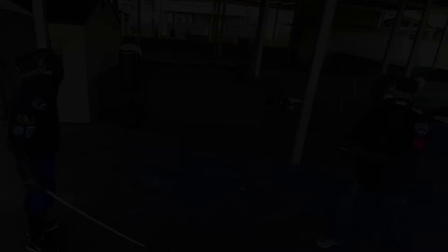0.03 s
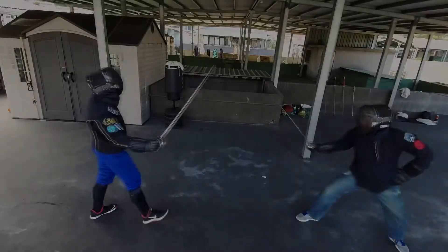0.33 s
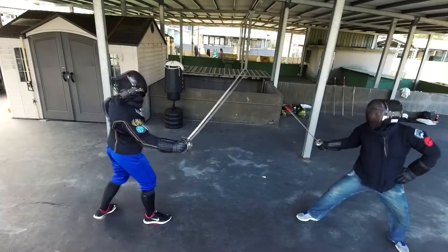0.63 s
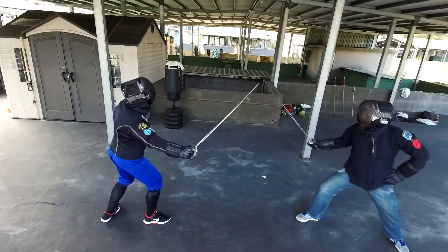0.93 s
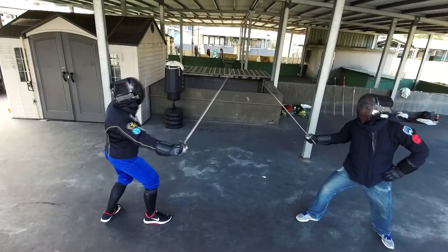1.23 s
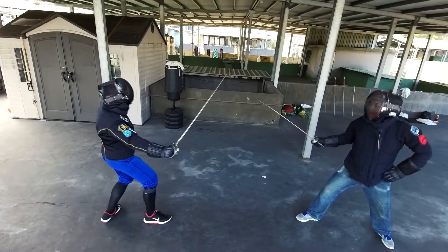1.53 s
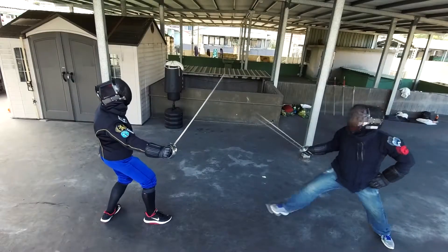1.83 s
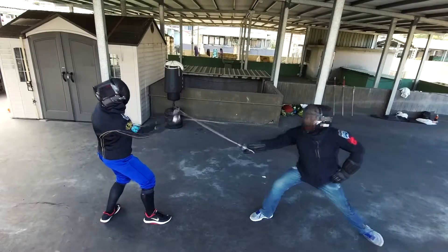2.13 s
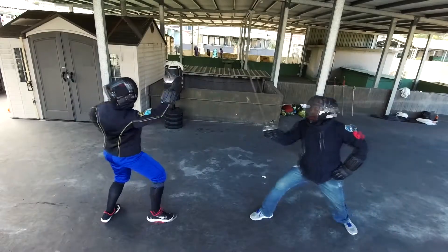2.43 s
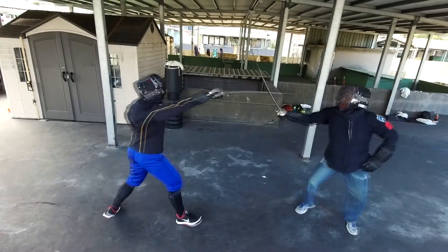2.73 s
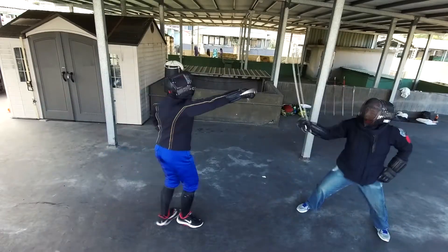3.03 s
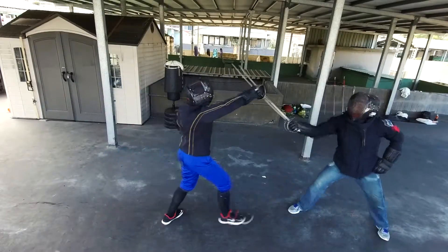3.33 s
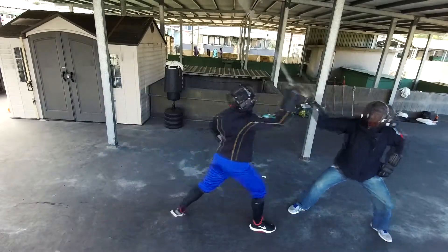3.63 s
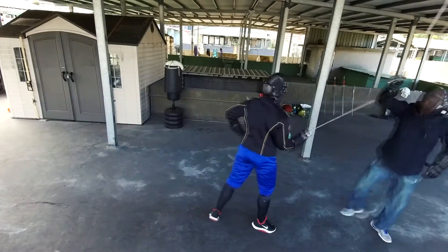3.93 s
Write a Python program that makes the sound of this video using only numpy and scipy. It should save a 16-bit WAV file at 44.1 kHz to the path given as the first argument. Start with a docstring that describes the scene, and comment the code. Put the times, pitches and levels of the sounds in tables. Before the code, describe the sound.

Steel sabres clash after about two seconds of faint outdoor hiss and hum. Two sharp parries ring briefly, then the blades scrape and knock again as shoes slap the pavement, with a short echo under a yard roof.

```python
"""Steel sabres clash as two fencers spar on pavement under a metal yard roof.
Two hard parries, then the blades bind, scrape in tiny slips and knock again while shoes slap the ground.
Each contact sets the modes of blades and hand guards ringing briefly, and the roof answers.
A faint machine hum sits in the background hiss."""
import sys
import numpy as np
from scipy import signal
from scipy.fft import rfft, irfft
from scipy.io import wavfile

SR = 44100
rng = np.random.default_rng(int(sys.argv[2]) if len(sys.argv) > 2 else 0)


def bounce(signal):
    """Save signal as a 16-bit WAV file at the path given by the first command-line argument."""
    frames = np.transpose(np.atleast_2d(signal))
    limited = np.clip(frames, -1, 1)
    pcm = np.round(limited * 32767).astype(np.int16)
    wavfile.write(sys.argv[1], SR, pcm)


N = 176400
TIME_S = np.arange(N) / SR


def from_db(db):
    """Decibels to gain."""
    return 10 ** (np.asarray(db) / 20)


def unit(x):
    """Scale to energy 1."""
    return x / np.sqrt(np.sum(x ** 2) + 1e-20)


def curve(points):
    """Gain over time from (time_s, level_db) points."""
    return from_db(np.interp(TIME_S, *np.transpose(points)))


def drift(turns_per_s):
    """Continuous random wander, spread about 1."""
    return np.interp(TIME_S * turns_per_s, np.arange(4000), rng.standard_normal(4000))


def add(out, start_s, x):
    """Mix x into out at start_s."""
    i = int(start_s * SR)
    out[i:i + len(x)] += x[:N - i]


def through(x, response):
    """Convolve with an impulse response."""
    return signal.fftconvolve(x, response)[:N]


def butter(x, cutoff_hz, kind="low"):
    """Second-order low-pass or high-pass."""
    return signal.sosfilt(signal.butter(2, cutoff_hz, kind, fs=SR, output="sos"), x)


def emphasise(x, freq_hz, boost_db, q):
    """Boost one resonance."""
    return x + (from_db(boost_db) - 1) * signal.lfilter(*signal.iirpeak(freq_hz, q, fs=SR), x)


def colour(points, size=8192):
    """Minimum-phase response from (freq_hz, level_db) points, energy 1."""
    freq_hz, level_db = np.transpose(points)
    bins_hz = np.fft.rfftfreq(size, 1 / SR)
    gain = from_db(np.interp(np.log(bins_hz + 1), np.log(freq_hz), level_db))
    cepstrum = irfft(np.log(gain))
    cepstrum[1:size // 2] *= 2
    cepstrum[size // 2 + 1:] = 0
    return unit(irfft(np.exp(rfft(cepstrum)))[:size // 2])


def tilt(db_per_octave):
    """Response with a treble slope from 2 to 16 kHz."""
    return colour([(2000, 0), (16000, 3 * db_per_octave)], size=512)


# Hiss spectrum: freq_hz, level_db
HISS_SPECTRUM = [(18, -79), (30, -49), (81, -34.5), (364, -8), (404, -9.5), (552, -6), (754, -7),
                 (815, -6.5), (1000, -5.5), (1090, -5.5), (1170, -7.5), (1300, -8), (1870, -10),
                 (2250, -10), (2630, -12.5), (3320, -16.5), (3780, -14.5), (4540, -16.5), (5030, -19),
                 (6700, -16), (10200, -18), (11900, -23), (15000, -35)]
# Hiss envelope: time_s, level_db
HISS_ENVELOPE = [(0.1, -44), (1.2, -44), (2.0, -44.5), (4.0, -42)]
# Machine tones: pitch_hz, level_db
HUM_TONES = [(829, -55.5), (1056, -56.5), (1265, -59), (2202, -59.5), (2261, -58), (4404, -63.5)]


def background(wander_hz=3.3, waver_db=2.0, wavers_per_s=14):
    """Outdoor hiss plus the wavering tones of a distant machine."""
    hiss = through(rng.standard_normal(N), colour(HISS_SPECTRUM))
    hiss = np.sqrt(N) * unit(hiss) * curve(HISS_ENVELOPE)
    hum = np.zeros(N)
    for pitch_hz, level_db in HUM_TONES:
        phase = 2 * np.pi * np.cumsum(pitch_hz + wander_hz * drift(wavers_per_s)) / SR
        hum += np.sqrt(2) * from_db(level_db + waver_db * drift(wavers_per_s)) * np.sin(phase)
    return hiss + hum


def chatter(decay_s):
    """Decaying burst of tiny contacts, energy 1."""
    t = TIME_S[:SR // 2]
    return unit(rng.standard_normal(len(t)) * np.exp(-t / decay_s))


# Footfalls: start_s, level_db, decay_s, pitch_hz, boost_db
FOOTFALLS = [(0.298, -26, 0.016, 288, 6.5), (3.446, -5.5, .006, 1130, 14.5), (3.892, 4, 0.011, 445, 0)]
# Sole slap spectrum: freq_hz, level_db
SLAP_SPECTRUM = [(40, -59), (110, -34), (190, -16), (270, 7), (450, 3.5), (700, 1.5), (1050, -0.5),
                 (1400, -6.5), (4000, -18.5), (10000, -18), (15000, -42)]
# Sole drags: start_s, length_s, level_db
SOLE_DRAGS = [(1.22, 0.16, -47.5), (2.696, 0.043, -42), (3.091, 0.027, -42.5)]
# Grit spectrum: freq_hz, level_db
GRIT_SPECTRUM = [(60, -35), (200, -9), (1500, 7), (3600, 5), (7000, -2), (15000, -15)]


def feet(slap_gain_db=4.5, attack_s=0.002):
    """Soles slap the pavement and drag over grit."""
    slaps, drags = np.zeros((2, N))
    for start_s, level_db, decay_s, pitch_hz, boost_db in FOOTFALLS:
        burst = emphasise(chatter(decay_s), pitch_hz, boost_db, q=6.3)
        attack = 1 - np.exp(-TIME_S[:len(burst)] / attack_s)
        add(slaps, start_s, from_db(slap_gain_db + level_db) * unit(burst * attack))
    for start_s, length_s, level_db in SOLE_DRAGS:
        swell = np.sqrt(np.hanning(int(length_s * SR)))
        add(drags, start_s, from_db(level_db) * swell * rng.standard_normal(SR)[:len(swell)])
    return through(slaps, colour(SLAP_SPECTRUM)) + through(drags, colour(GRIT_SPECTRUM))


# Reflections off ground, posts and roof: delay_s, level_db
REFLECTIONS = [(.0042, -17), (.0095, -14.5), (0.0205, -17)]


def yard(x, tail_db=-10, t60_s=0.52, build_s=0.017, split_hz=9000, treble_decay_ratio=1.62):
    """Near echoes and a diffuse tail under the roof; treble dies first."""
    t = TIME_S[:SR]
    fall_db = -60 * t / t60_s
    low = butter(rng.standard_normal(SR), split_hz) * from_db(fall_db)
    high = butter(rng.standard_normal(SR), split_hz, "high") * from_db(fall_db * treble_decay_ratio)
    build = 1 - np.exp(-t / build_s)
    response = from_db(tail_db) * unit((low + high) * build)
    for delay_s, level_db in REFLECTIONS:
        response[int(delay_s * SR)] += from_db(level_db)
    return through(x, response)


def ring(modes, length_s=0.7):
    """Impulse response of (freq_hz, level_db, t60_s) modes, energy 1."""
    t = TIME_S[:int(length_s * SR)]
    response = np.zeros(len(t))
    for freq_hz, level_db, t60_s in modes:
        envelope = from_db(level_db - 60 * t / t60_s)
        response += rng.choice([-1, 1]) * envelope * np.cos(2 * np.pi * freq_hz * t)
    return unit(response)


def shimmer(t60_s=0.23, build_s=0.001):
    """Dense bending and twisting modes of two long blades blur into a dying hiss, energy 1."""
    t = TIME_S[:SR // 2]
    envelope = from_db(-60 * t / t60_s) * (1 - np.exp(-t / build_s))
    return unit(rng.standard_normal(len(t)) * envelope)


# Blade hits: start_s, level_db, decay_s, tilt_db_per_octave, pitch_hz, boost_db, guard1_db, guard2_db
BLADE_HITS = [(2.279, 0, 0.0073, 0.3, 4817, 12, 0, -10), (2.3016, -14, 0.0021, 8, 10260, 13.5, -7, -10),
              (2.3167, -4.5, 0.014, -2.5, 6430, 6, 1.5, -6), (2.8466, 5.5, 0.027, 0.2, 1854, 5, -16, -7),
              (3.176, -13, 0.011, -2, 7460, 14.5, -12, -10), (3.214, -20, 0.023, -4, 6900, 6, -16, -18),
              (3.338, -23.5, 0.0042, -3, 9000, -6, -4, 9), (3.5471, -2, 0.024, 0.5, 4650, 9, -4, 3),
              (3.643, -8, 0.025, 2, 5570, 10.5, -2.5, -10),
              (3.6797, -5.5, 0.0068, 2, 6860, 13.5, -4.5, -30),
              (3.8347, -9.5, 0.0031, -2.5, 4470, 10, -9.5, -5)]


def strikes(gain_db=15, tick=0.23, ping_db=-19, ping_t60_s=0.06, contact_db=-3, shimmer_db=-5.5):
    """Tick, chatter, ping pitched by contact point, shimmer; returns clashes, blade and guard jolts."""
    clashes, blade_jolts, guard1_jolts, guard2_jolts = np.zeros((4, N))
    for start_s, level_db, decay_s, slope, pitch_hz, boost_db, guard1_db, guard2_db in BLADE_HITS:
        gain = from_db(gain_db + level_db)
        crack = chatter(decay_s)
        crack[0] += tick
        crack = emphasise(crack, pitch_hz, boost_db, q=10.3)
        ping = from_db(ping_db + boost_db) * ring([(pitch_hz, 0, ping_t60_s)])[:len(crack)]
        hit = from_db(contact_db) * (crack + ping) + from_db(shimmer_db) * shimmer()
        add(clashes, start_s, gain * through(hit, tilt(slope)))
        for jolts, share_db in ((blade_jolts, 0), (guard1_jolts, guard1_db), (guard2_jolts, guard2_db)):
            add(jolts, start_s, gain * from_db([share_db]))
    return clashes, blade_jolts, guard1_jolts, guard2_jolts


# Steel-on-steel spectrum: freq_hz, level_db
STEEL_SPECTRUM = [(40, -51), (120, -16), (200, -23), (450, -6.5), (1200, -3.5), (1800, 7), (2800, 5),
                  (4000, 4), (6500, 5), (10500, 5), (12500, 1.5), (15000, -9)]
# Low ring of the yard roof (647 and 1035 Hz), then blade modes: freq_hz, level_db, t60_s
ROOF_AND_BLADE_MODES = [(647, -9, .3), (1035, -5, .4), (2839, -3, .25), (3203, -6, .3), (3431, -6, .3),
                        (3590, -5, .3), (3836, -2, .3), (4610, -2, .3), (4824, -3, .3), (5252, 0, .3),
                        (5685, -3, .3), (5982, 0, .3), (6239, 0, .2), (6584, -2, .3), (7478, -2, .25),
                        (7740, 0, .3), (8236, -4, .3), (8540, -3, .3), (8759, -5, .2), (9171, 0, .22),
                        (9778, -4, .22), (10148, -5, .22), (10918, -4, .22)]
# Hand guard modes: freq_hz, level_db, t60_s
GUARD1_MODES = [(1557, -14, .15), (1903, 0, .45), (1969, -9, .2), (2205, -13, .2), (2340, -7, .2)]
GUARD2_MODES = [(1682, -7, .2), (1757, -4, .2), (1845, -4, .17), (1955, 0, .38), (1986, -3, .17),
                (2148, -5, .22), (2243, -9, .28), (2364, -7, .16), (2424, -9, .14)]


def sabres(roof_blade_db=-14, guard_db=-4, scrape_ring_db=11, scrape_guard_db=-2):
    """Strikes and scrape drive the steel; returns contact noise and the ring of roof, blades, guards."""
    clashes, blade_jolts, guard1_jolts, guard2_jolts = strikes()
    slide = scrape()
    roof_and_blades = through(blade_jolts + from_db(scrape_ring_db) * slide, ring(ROOF_AND_BLADE_MODES))
    guard1 = through(guard1_jolts, ring(GUARD1_MODES))
    guard2 = through(guard2_jolts + from_db(scrape_guard_db) * slide, ring(GUARD2_MODES))
    contact = through(clashes + slide, colour(STEEL_SPECTRUM))
    ringing = from_db(roof_blade_db) * roof_and_blades + from_db(guard_db) * (guard1 + guard2)
    return contact, ringing


# Pressure between sliding blades: time_s, level_db
BIND_PRESSURE = [(3.19, -30.5), (3.25, -37), (3.29, -42.5), (3.335, -32.5), (3.36, -42.5), (3.388, -44),
                 (3.397, -31), (3.412, -29), (3.42, -26.5), (3.46, -22), (3.50, -24), (3.54, -27.5),
                 (3.575, -30.5), (3.61, -34), (3.67, -45), (3.72, -32.5), (3.76, -41), (3.82, -51),
                 (3.87, -40), (3.92, -39.5), (3.99, -57)]


def scrape(slips_per_s=7000, spread_db=2.6, top_hz=12200, catches_per_s=250, catch_db=1):
    """Edge slides over edge in uneven slips, catching and letting go."""
    slips = (rng.random(N) < slips_per_s / SR) * rng.choice([-1, 1], N)
    strength = from_db(spread_db * np.minimum(rng.exponential(1, N), 5))
    friction = butter(through(slips * strength, tilt(db_per_octave=0.1)), top_hz)
    pressure = curve(BIND_PRESSURE) * (TIME_S > BIND_PRESSURE[0][0])
    catching = from_db(catch_db * drift(catches_per_s))
    return np.sqrt(N) * unit(friction) * pressure * catching


def scene(ring_send_db=-11):
    """Sabres and feet in the yard over the background, mono."""
    contact, ringing = sabres()
    steps = feet()
    reverb = yard(contact + steps + from_db(ring_send_db) * ringing)
    return (contact + ringing + steps + reverb + background())[None]


def record(dry, start_s=0.105, ceiling=0.83, cutoff_hz=15300):
    """Soft clip, silence until start_s, steep low-pass."""
    clipped = dry / (1 + (dry / ceiling) ** 4) ** (1 / 4)
    lowpass = signal.ellip(12, 0.1, 70, cutoff_hz, fs=SR, output="sos")
    return signal.sosfilt(lowpass, clipped * (TIME_S > start_s))


dry = scene()
out = record(dry)
bounce(out)
```